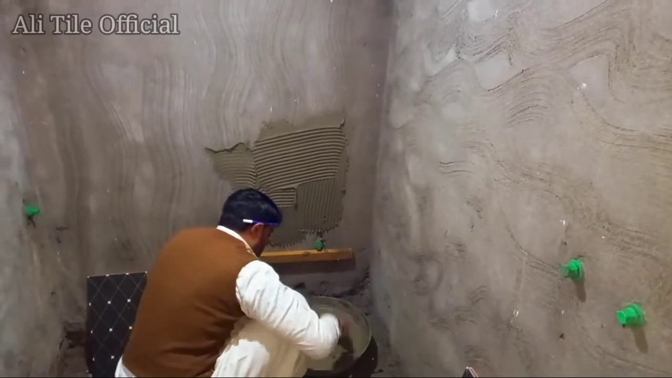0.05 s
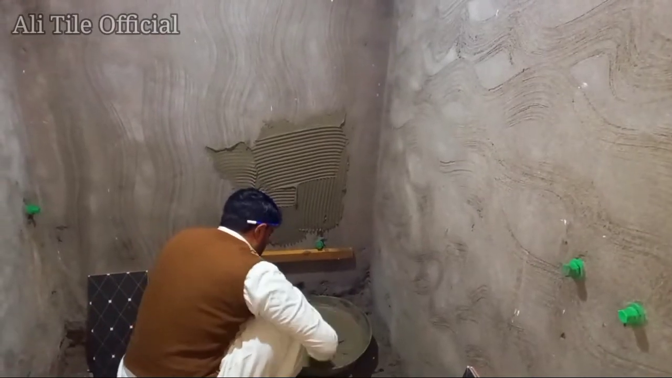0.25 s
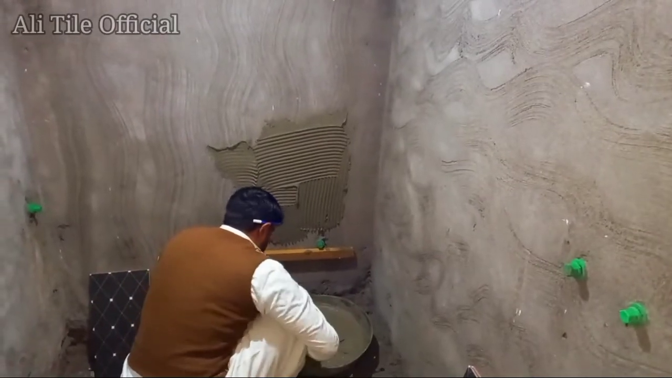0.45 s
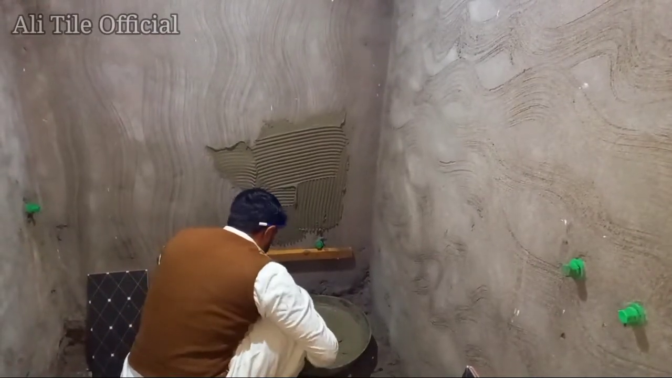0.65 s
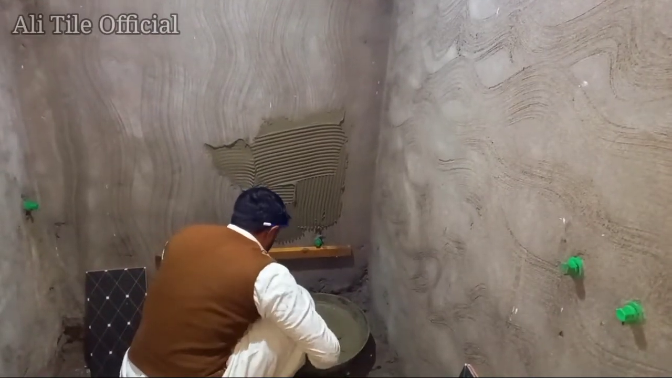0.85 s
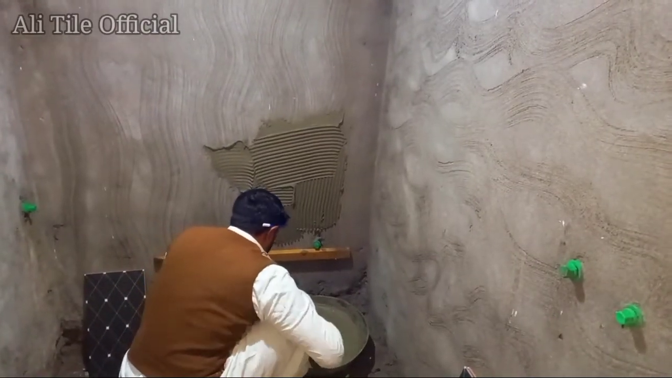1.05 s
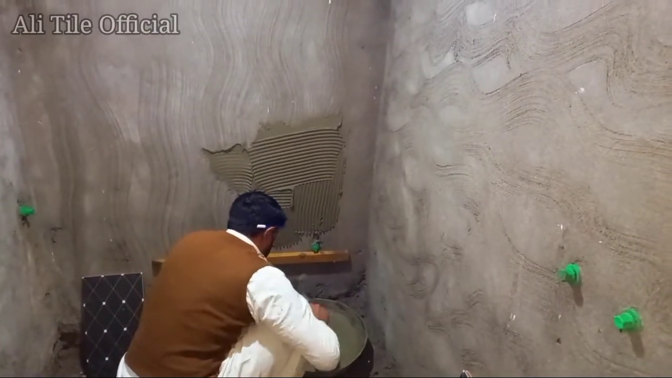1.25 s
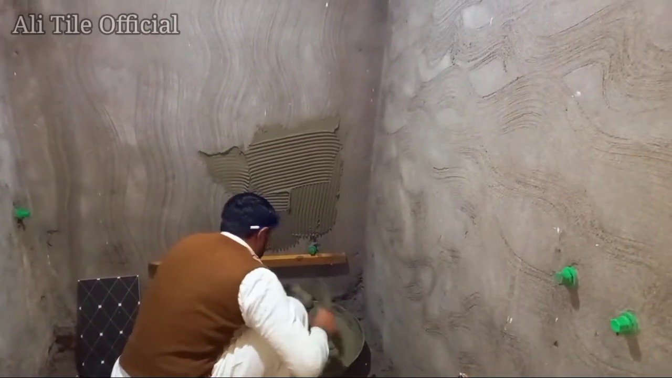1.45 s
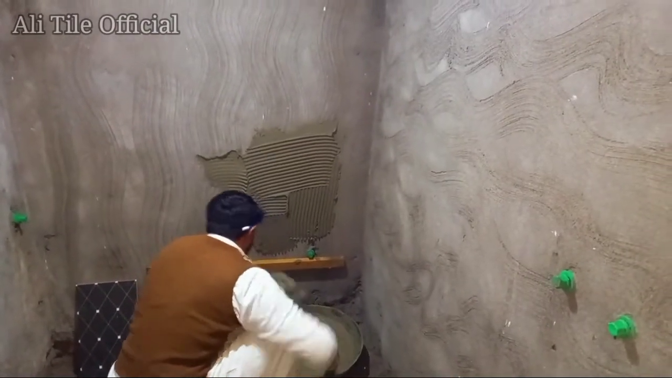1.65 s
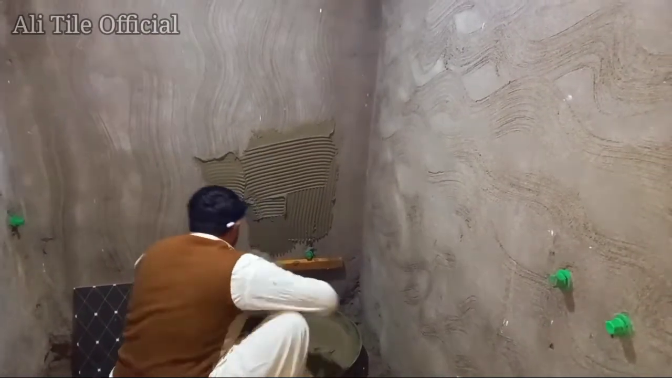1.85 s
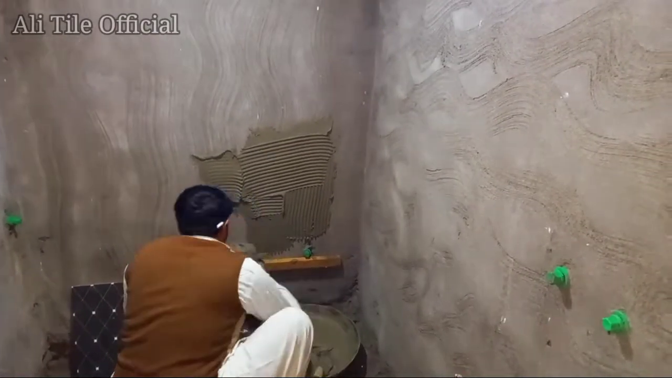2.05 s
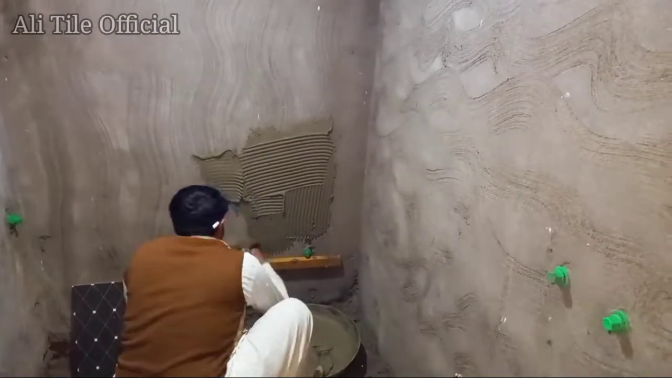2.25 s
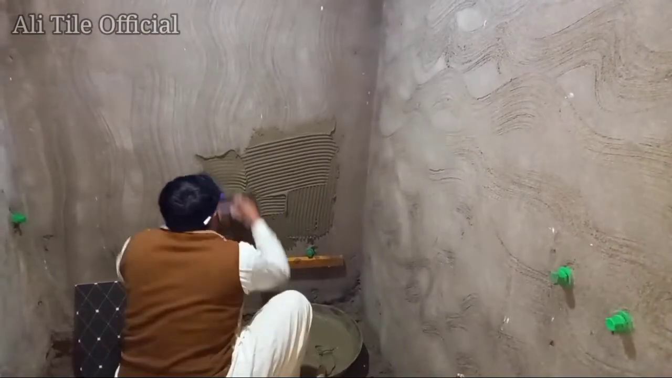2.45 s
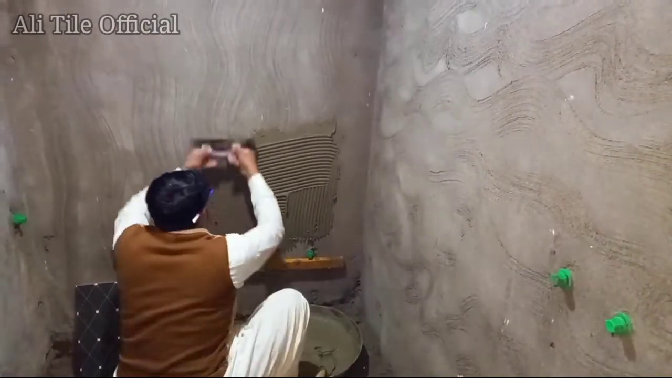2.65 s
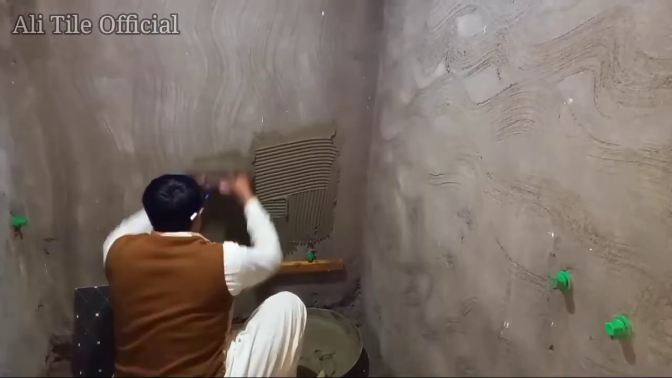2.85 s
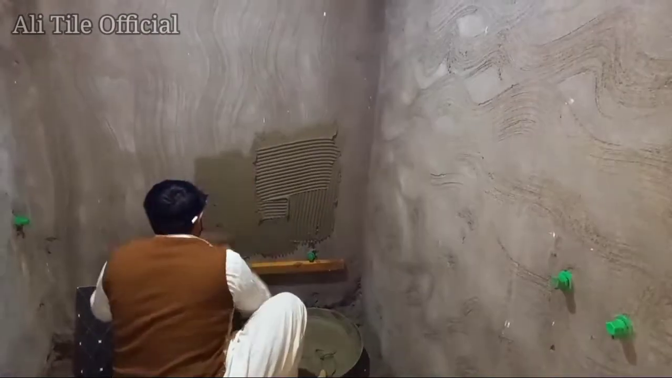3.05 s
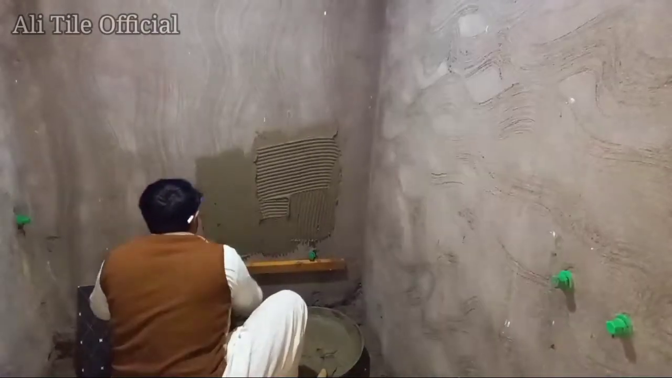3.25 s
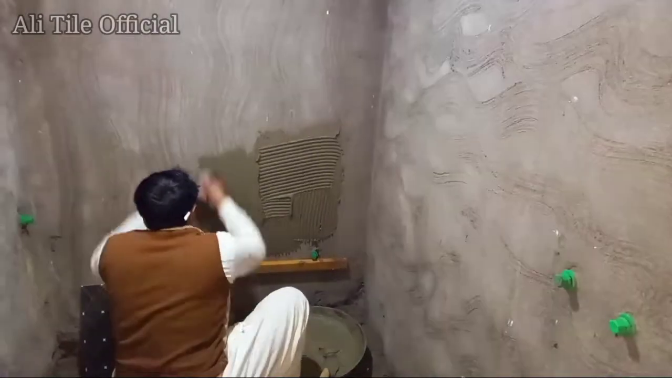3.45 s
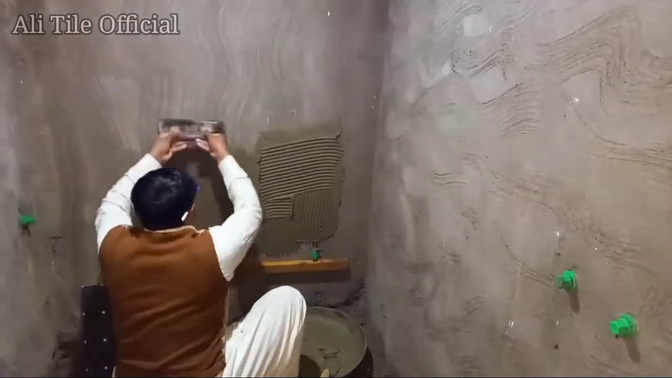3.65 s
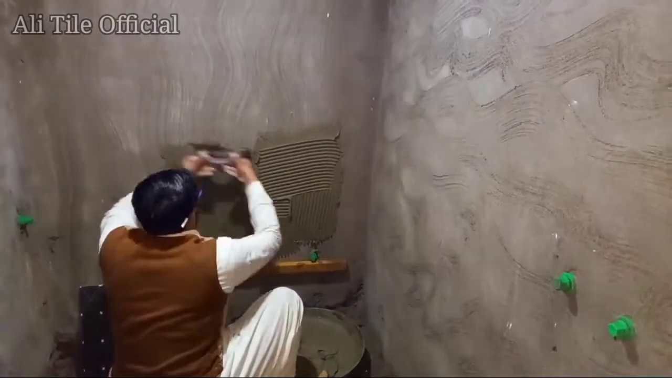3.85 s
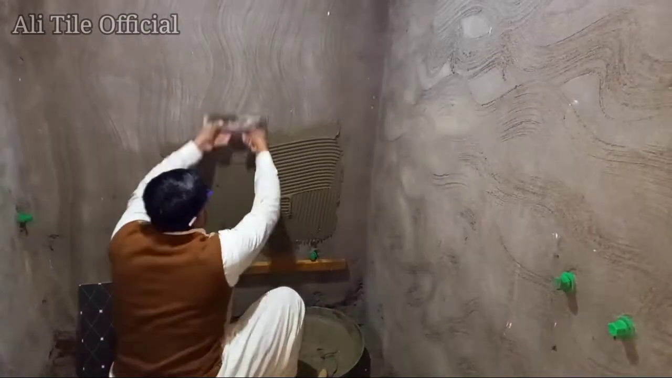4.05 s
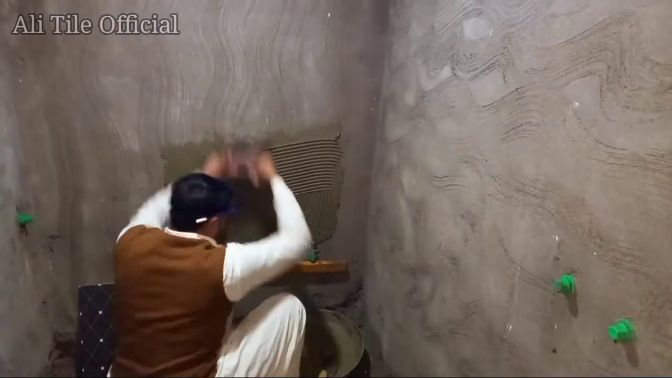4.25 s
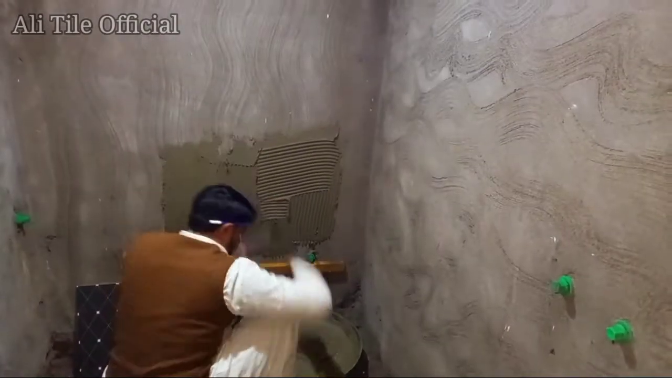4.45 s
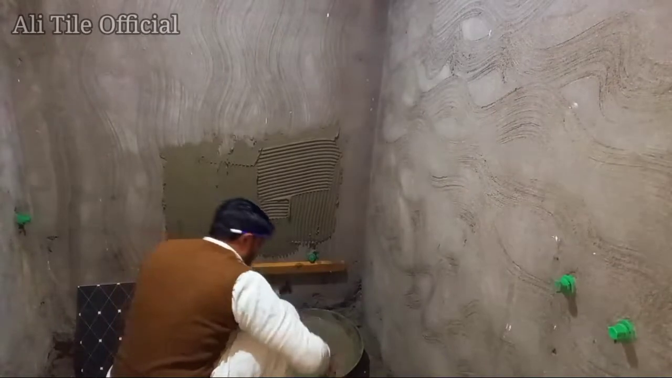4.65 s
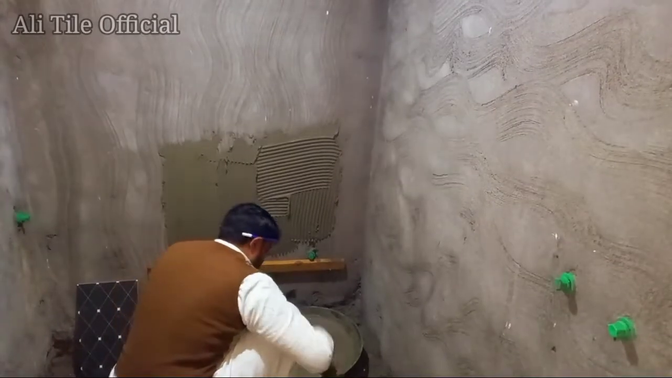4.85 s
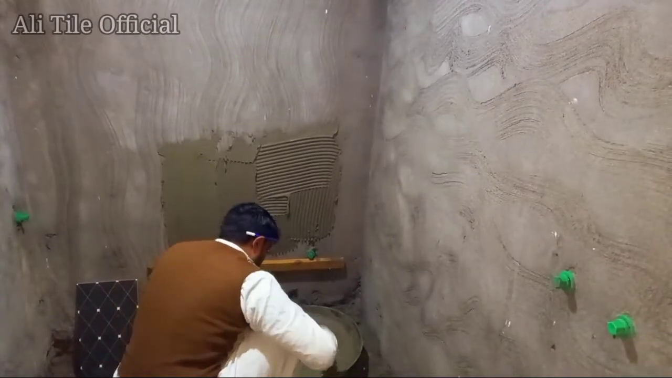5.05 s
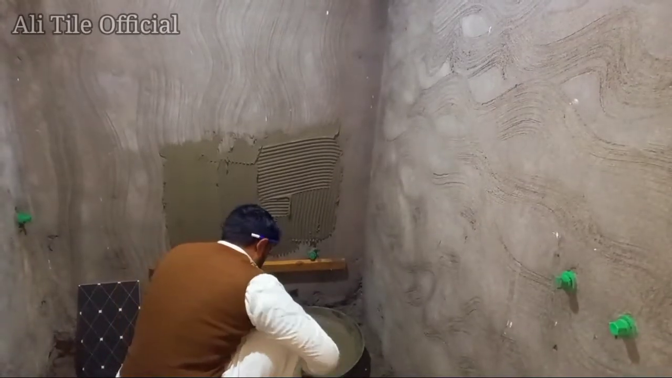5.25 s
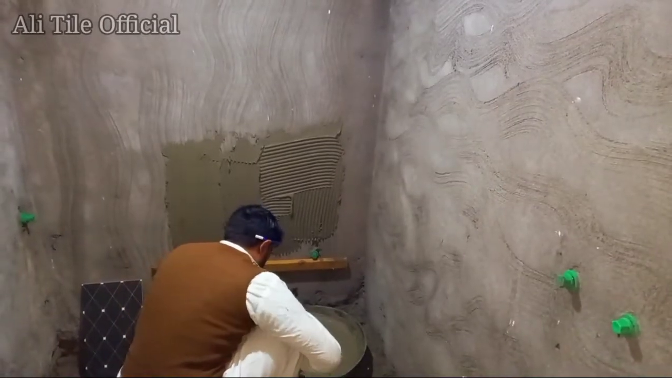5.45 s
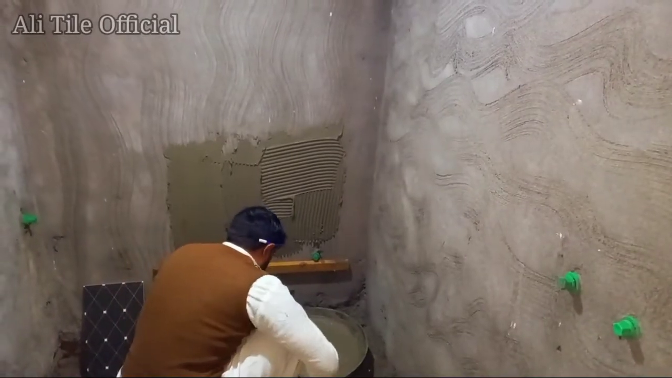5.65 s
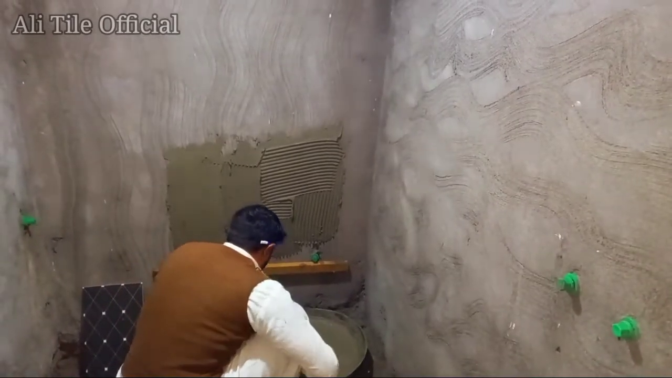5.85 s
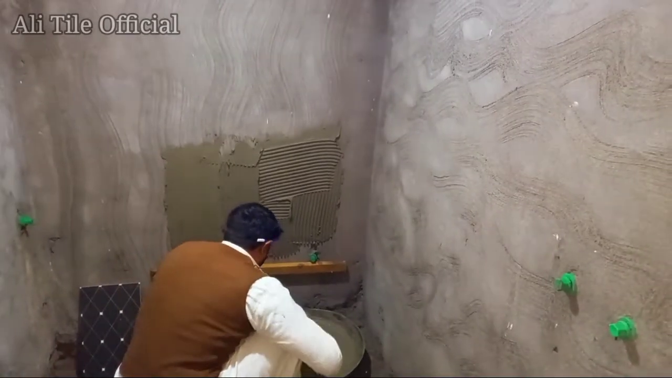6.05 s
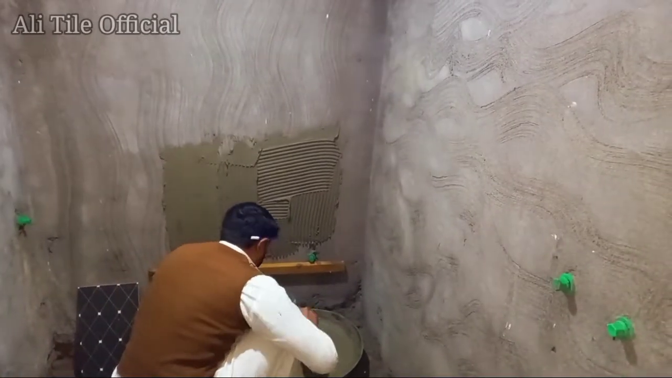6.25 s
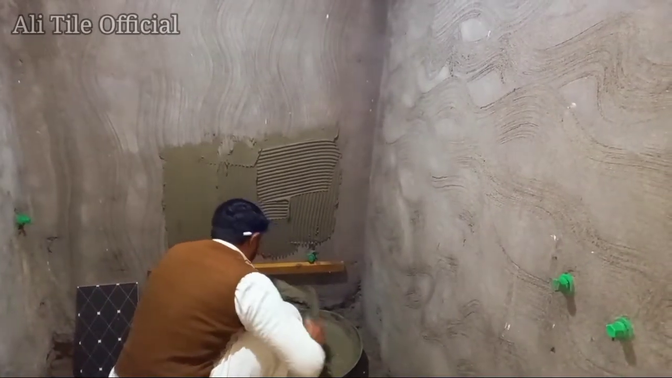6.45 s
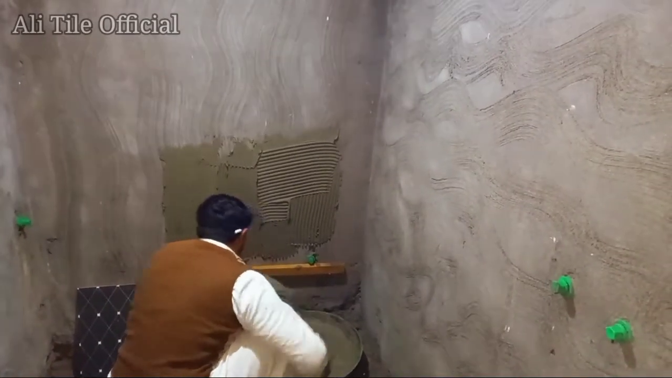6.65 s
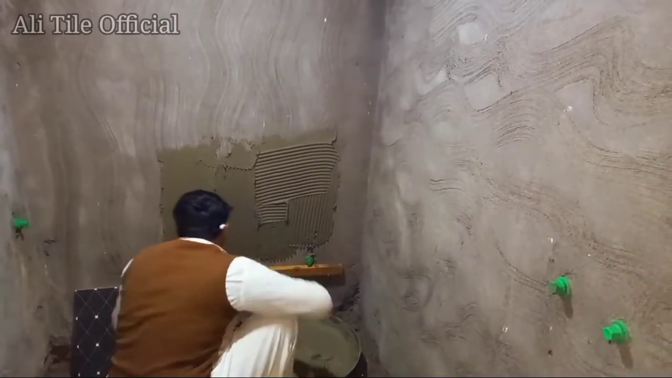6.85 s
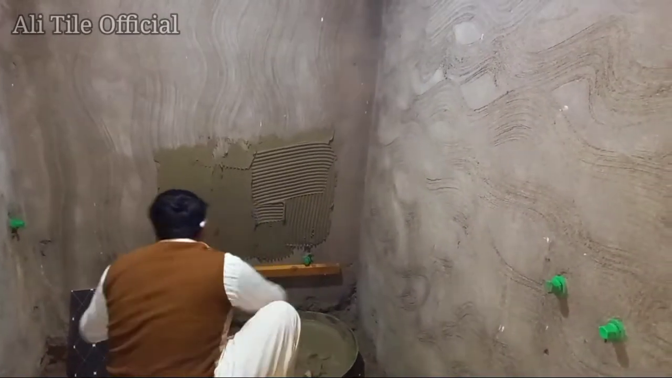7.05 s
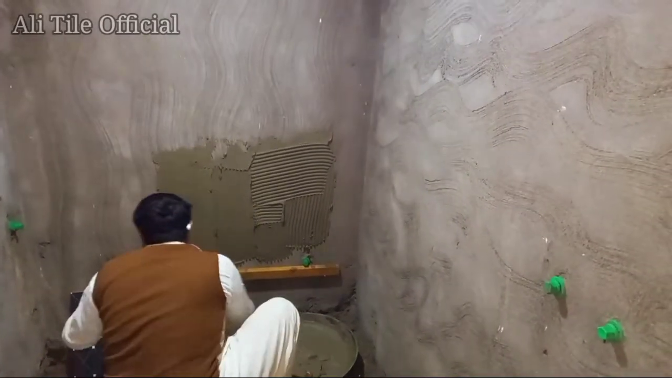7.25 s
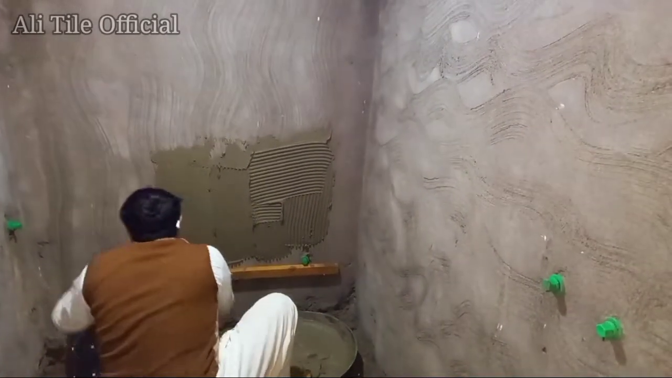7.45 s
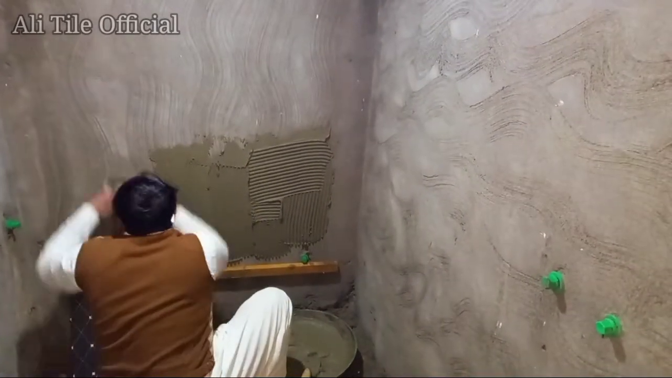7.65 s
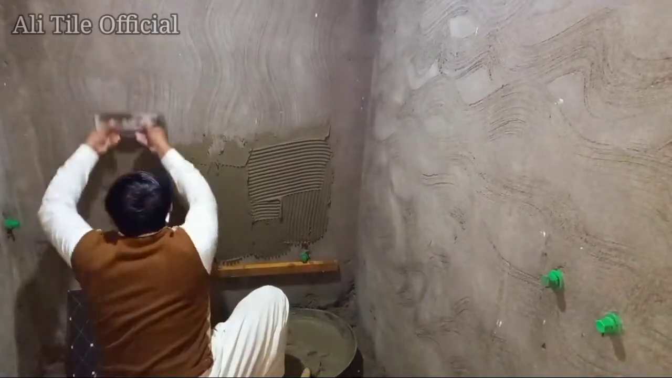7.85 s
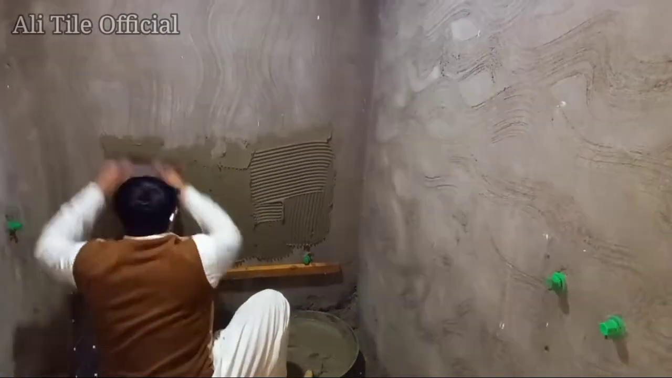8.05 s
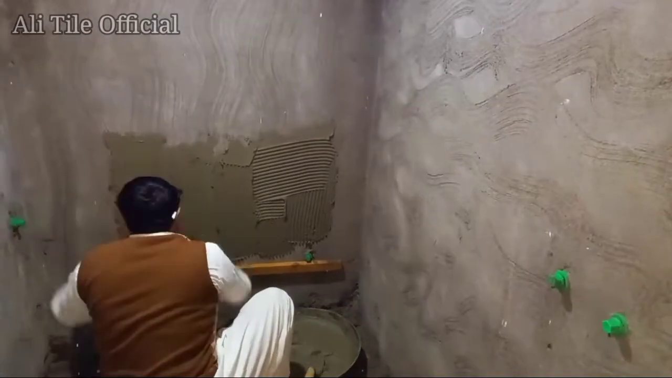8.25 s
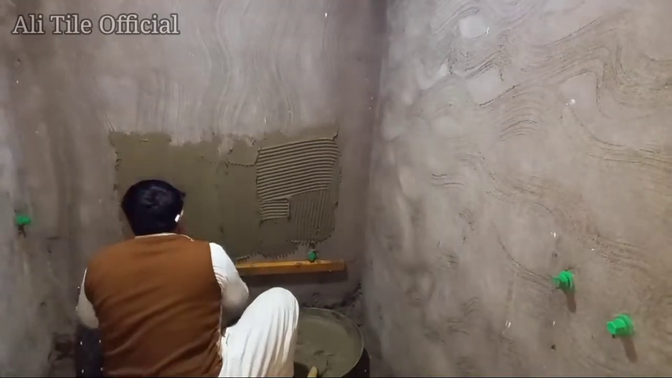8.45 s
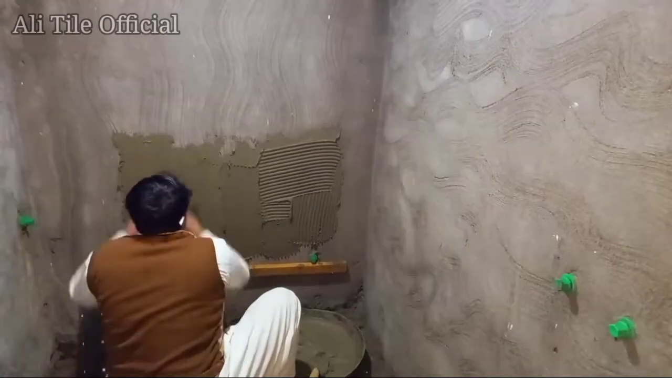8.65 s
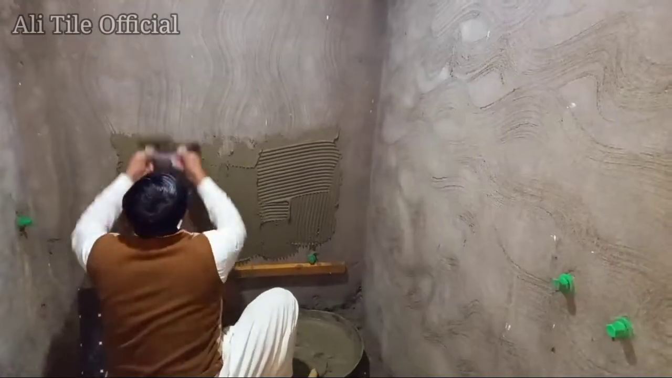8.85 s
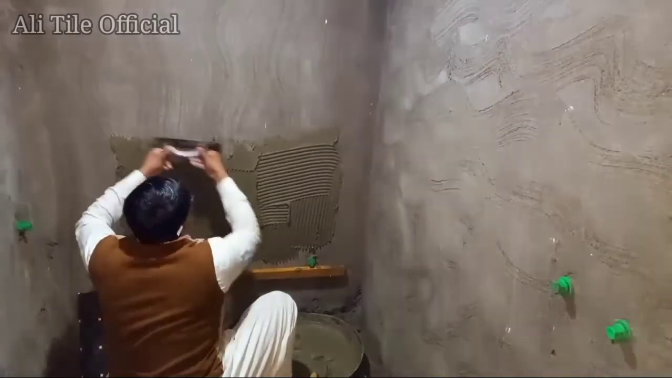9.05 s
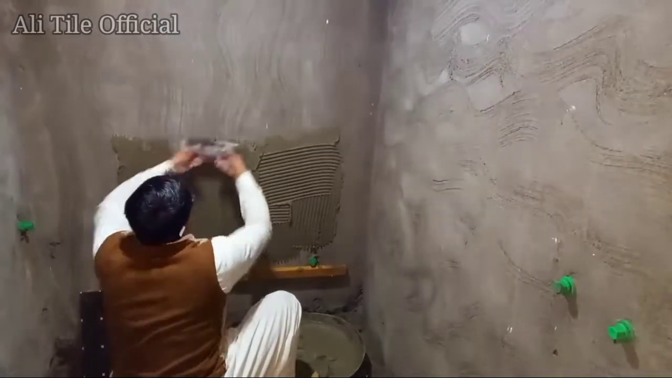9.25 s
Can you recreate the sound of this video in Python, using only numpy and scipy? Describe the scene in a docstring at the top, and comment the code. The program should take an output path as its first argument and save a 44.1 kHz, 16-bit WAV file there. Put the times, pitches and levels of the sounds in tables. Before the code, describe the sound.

Soft gritty stirring and small scrapes come first, then a solid thud with a metallic click, and hissing, ringing trowel strokes over a rough wall. The work drops back to faint tub scraping, with a few sharper scuffs, before a second knock and more strokes, ending on a hard slap of the blade. Clothes rustle lightly. The bare room rings on briefly after each sound; the stereo pickup is slightly distant, with faint hiss.

```python
"""Trowel and adhesive in a bare room

In a small bare room a steel trowel scoops sandy adhesive from a tub and drags it over a plastered wall.
Random sand grains catch under the edge; filtered, they hiss, ring the blade and shake the surface below.
Lumps of paste land with thuds, the edge ticks, the blade hums briefly and clothes rustle.
Hard walls ring on after each stroke, with standing waves in the bass; a low murk and hiss lie behind.
All is heard through a two-port microphone that loses the deep bass and the top of the treble."""
import sys
import numpy as np
from scipy import signal
from scipy.fft import rfft, irfft, next_fast_len
from scipy.io import wavfile
from scipy.ndimage import uniform_filter1d

SR = 44100
rng = np.random.default_rng(int(sys.argv[2]) if len(sys.argv) > 2 else 0)


def output_pcm(signal):
    """Save a mono or channel-first signal as 16-bit PCM at the path in sys.argv[1].

    Samples are clipped to [-1, 1] before scaling.
    """
    pcm = np.clip(np.atleast_2d(signal).T, -1, 1) * 32767
    wavfile.write(sys.argv[1], SR, np.round(pcm).astype(np.int16))


N = 410571  # length in samples


def amp(db):
    """Turns dB into a linear gain."""
    return 10 ** (np.asarray(db) / 20)


def evened(x):
    """Scales a sound to rms 1."""
    return x / np.sqrt(np.mean(x ** 2) + 1e-20)


def read(points, hz):
    """Reads a (Hz, value) curve, with straight lines over log frequency."""
    f, value = np.transpose(points)
    return np.interp(np.log(hz + 1), np.log(f + 1), value)


def add(mix, s, sound):
    """Lays a sound into the mix at s seconds, cut off at the end of the mix."""
    part = mix[round(s * SR):][:len(sound)]
    part += sound[:len(part)]


def coloured(x, points):
    """Filters by a dB spectrum, to rms 1."""
    size = next_fast_len(len(x))
    gain = amp(read(points, np.fft.rfftfreq(size, 1 / SR)))
    return evened(irfft(rfft(x, size) * gain, size)[:len(x)])


def resonate(x, hz, width):
    """One steady resonance of gain 1 at its peak."""
    return signal.lfilter(*signal.iirpeak(hz, hz / max(width, 3), SR), x)


def sliding(x, hz, width):
    """A moving resonance: shifts the curve hz down to zero, smooths, and shifts back."""
    turn = np.exp(2j * np.pi * np.cumsum(hz) / SR)
    smooth = signal.lfilter(*signal.butter(N=2, Wn=width / 2, fs=SR), x / turn)
    return evened((turn * smooth).real)


def wavering(size):
    """Slow random wander of rms 1: noise averaged twice over size samples."""
    return evened(uniform_filter1d(uniform_filter1d(rng.standard_normal(N), size=size), size=size))


SWELL = 2.02  # exponent: the level in dB moves fast at first, then levels off


def played(starts, lengths, first_db, last_db, fades):
    """Gain over time: each event starts at once, moves to its last level and lets go; the loudest counts."""
    db, t = np.full(N, -200.), np.arange(N) / SR
    for start, length, first, last, fade in np.broadcast(starts, lengths, first_db, last_db, fades):
        left = np.clip(1 - (t - start) / max(length, 1e-3), 0, 1)
        let_go_db = 60 * np.maximum(t - start - length, 0) / max(fade, 1e-2)  # fade is the time to fall 60 dB
        now = last + (first - last) * left ** SWELL - let_go_db
        db = np.maximum(db, np.where(t >= start, now, -200))
    return uniform_filter1d(amp(db), size=90)


# Likeness of left and right. Each row: frequency in Hz, correlation from -1 to 1.
LIKENESS = [(60, 0.8), (130, 0.83), (300, 1), (600, .55), (1000, -0.23), (1500, -0.11), (2500, -0.044),
            (8000, -0.047)]


def paired(a, b):
    """Two channels whose likeness varies with frequency, high in the bass and near none in the treble."""
    same = np.clip(read(LIKENESS, np.fft.rfftfreq(len(a), 1 / SR)), -1, 1)
    right = irfft(same * rfft(a) + np.sqrt(1 - same ** 2) * rfft(b), len(a))
    return np.array([a, right])


# Spectrum of the quiet background. Each row: frequency in Hz, relative level in dB per Hz.
HUSH_SPECTRUM = [(25, -21), (45, -12.5), (65, 6), (95, -3.5), (150, -7.5), (200, -6), (320, -7.5),
                 (500, -22.5), (800, -16), (1250, -21), (1800, -16), (2600, -27), (7500, -23.5),
                 (10000, -32), (16000, -38.5)]
HUSH_DB = -70  # middle level at the microphone, before its own filters


def hush():
    """Low distant murk of the building and microphone hiss: shaped noise, wavering slowly by about 2 dB."""
    sway = wavering(size=6000)
    left, other = (coloured(rng.standard_normal(N), HUSH_SPECTRUM) for _ in "LR")
    return amp(HUSH_DB + 2 * sway) * paired(left, other)


def sand(per_s, spread_db):
    """Grains catch the edge at random, a few much harder; the drag judders."""
    size = amp(spread_db * np.minimum(rng.exponential(1, N), 5)) * rng.choice([-1., 1.], N)
    judder_db = 2.4 * wavering(size=700)
    caught = rng.random(N) < per_s / SR
    return size * caught * amp(judder_db)


# Hiss of the grit, close to the blade. Each row: frequency in Hz, relative level in dB per Hz.
GRIT_SPECTRUM = [(410, -37.5), (700, -27), (922, -3.5), (1260, -7), (1460, -6), (2160, -6), (2660, -3.5),
                 (9480, -6.5), (14200, -6.5), (16000, -13.5)]
# Clothes rustle as the worker turns.
# Each row: start in seconds, length in seconds, first and last level in dB before the room.
RUSTLES_HEARD = [(1.87, 0.14, -68, -62), (4.4, 0.045, -64, -73), (6.92, 0.25, -56.5, -63),
                 (8.1, 0.14, -65, -74), (9.05, 0.23, -57, -56.5)]
RUSTLE_FADE_S = 0.25  # time to fall 60 dB


def rustles():
    """Soft broad swish of cloth: dense, nearly equal random clicks in the colour of the grit."""
    cloth = coloured(sand(per_s=7500, spread_db=0.5), GRIT_SPECTRUM)
    return played(*np.transpose(RUSTLES_HEARD), RUSTLE_FADE_S) * cloth


# The blade hums briefly on one mode. Each row: start in seconds, length in seconds, centre in Hz,
# width in Hz (never under 50 in use), level in dB before the room and the rise and fall.
BLADE_HUMS = [(0.002, .11, 765, 50, -74), (2.09, .1, 1150, 450, -62), (3.09, .08, 800, 300, -66),
              (4.15, .07, 1050, 110, -41), (4.74, .05, 2400, 150, -72), (4.92, .5, 1720, 260, -77),
              (5.1, .32, 985, 60, -70), (6.24, .07, 3200, 150, -51), (6.52, .28, 7600, 400, -64),
              (6.69, .12, 3130, 90, -60), (6.95, .2, 1850, 350, -63), (8.95, .2, 930, 90, -49)]


def hums():
    """Brief blade hums: noise through two equal resonances in a row, under a rounded rise and fall."""
    out = np.zeros(N)
    for s, length, hz, width, db in BLADE_HUMS:
        shape = np.sin(np.pi * np.arange(0, length, 1 / SR) / length) ** .5
        wide = max(width, 50)
        tone = evened(resonate(resonate(rng.standard_normal(SR), hz, wide), hz, wide))
        add(out, s, amp(db) * shape * tone[-len(shape):])
    return out


# The blade edge touches down.
# Each row: time in seconds, level in dB of total energy before the room, centre in Hz.
EDGE_TICKS = [(1.674, -21, 1010), (1.755, 3.5, 2000), (3.183, -15, 2010), (3.96, -5, 1690),
              (6.221, -10.5, 3160), (6.513, -17, 2170), (6.704, -26, 2990), (6.817, 3.5, 1930),
              (7.403, -13.5, 2000), (7.841, -5, 1650), (9.244, -16.5, 1980)]


def ticks():
    """Sharp edge contacts: a click and a burst of grit through two wide resonances."""
    out, t = np.zeros(N), np.arange(8192) / SR
    for s, db, hz in EDGE_TICKS:
        grit = 0.085 * rng.standard_normal(len(t)) * amp(-60 * t / .03)
        snap = np.exp(-t * 30000) + grit
        tick = resonate(resonate(snap, hz, 1.6 * hz), hz, 1.6 * hz) + amp(-25.5) * snap
        add(out, s, amp(db) * tick / np.linalg.norm(tick))
    return out


# Paste or blade lands. Each row: time in seconds, level in dB of total energy before the room,
# lower and upper band edge in Hz, decay constant of the squash in seconds.
LANDINGS = [(1.263, -13.5, 234, 497, 0.0043), (1.756, 21, 140, 706, 0.012), (3.188, -9.5, 202, 603, 0.0064),
            (3.96, -7.5, 93.6, 1223, 0.0075), (6.819, 19, 198, 810, 0.0043), (7.401, 5, 206, 328, 0.0096),
            (9.245, 8.5, 196, 910, 0.017)]


def thuds():
    """Dull squashes: a first touch, then noise as the paste spreads, weakened outside a band."""
    out, t = np.zeros(N), np.arange(8192) / SR
    for s, db, low_hz, high_hz, squash in LANDINGS:
        contact = np.exp(-t * 3000)
        push = 1.1 * contact + 0.24 * np.exp(-t / squash) * rng.standard_normal(len(t))
        push = signal.sosfilt(signal.butter(N=4, Wn=high_hz, fs=SR, output="sos"), push)
        weight = amp(-12.0) * push  # the floor takes some of the blow
        push = weight + signal.sosfilt(signal.butter(N=2, Wn=low_hz, btype="high", fs=SR, output="sos"), push)
        add(out, s, amp(db) * push / np.linalg.norm(push))
    return out


# Broad ring of the blade. Each row: frequency in Hz, relative level in dB per Hz.
BLADE_SPECTRUM = [(290, -54.5), (500, -21.5), (552, -20.5), (795, -9), (1480, -6.5), (1680, -4),
                  (1970, -4.5), (3200, -5), (7000, -17.5), (9100, -40), (15400, -120)]
# Narrower modes of the steel. Each row: frequency in Hz, width in Hz, relative level in dB.
STEEL_MODES = [(1720, 29, 0), (3000, 29, -33), (3740, 110, -19), (5370, 28, -31), (5700, 130, -7.5),
               (5665, 110, -4), (6800, 510, -8.5), (7530, 380, 6), (7980, 73, -0.5)]
# Rumble of the tub or wall. Each row: frequency in Hz, relative level in dB per Hz.
RUMBLE_SPECTRUM = [(40, -13), (110, -6), (220, 0), (400, 6.5), (800, 0), (1300, -14), (2500, -47.5)]
# Pushes of the blade. Each row: start in seconds, length in seconds, grit in dB before the room at the
# start and at the end of the push, time in seconds for the grit to fall 60 dB after letting go, blade ring
# in dB over grit, rumble of tub or wall in dB over grit, blade ring in Hz, hollow under the blade in Hz
# at the start and at the end.
PUSHES = [ (0.18, 0.095, -54.5, -56.5, 0.13, -32, -2.5, 2250, 469, 518),
          (0.33, .19, -65, -68.5, .1, -17, -15, 1922, 398, 329),
          (0.559, 0.14, -58, -40, 0.14, 1, 6, 2038, 378, 550),
          (1.242, .015, -46, -41, .1, -11, -7, 2000, 365, 358),
          (1.261, .01, -39, -36, 0.018, -13, -4, 1986, 360, 357),
          (1.32, .012, -51, -43.5, 0.036, -11, 2.5, 1902, 352.3, 355),
          (1.67, 0.0045, -40, -48, 0.026, -6, -4.5, 1909, 349, 351.8),
          (2.232, .065, -40.5, -40.5, .3, -17.5, -1, 1836, 269.3, 264.4),
          (2.35, .34, -39.5, -31.5, .16, -8.5, -4, 2055, 300, 420),
          (2.7, 0.032, -27, -38, 0.085, 0, -0.5, 2060, 520, 500),
          (3.173, 0.033, -31, -43.5, 0.4, -10, -2, 1850, 598, 470),
          (3.31, 0.19, -56.5, -38, 0.32, -3.5, -17, 1882, 485, 937),
          (3.548, 0.11, -35, -27.5, 0.14, 5.5, -10, 2130, 861, 817),
          (3.956, .025, -42, -38.5, 0.23, -3.5, 4, 1950, 686, 710),
          (4.0, 0.1, -26.5, -23, 0.21, 2.5, -15.5, 1927, 723, 902),
          (4.724, .02, -72.5, -78, .3, 9.5, 8.5, 1864, 600, 618.5),
          (4.83, 0.095, -74.5, -66.5, .2, -18, -22, 1907, 618.5, 622),
          (5.19, .17, -62, -68, 0.21, -10.5, -21, 1930, 668, 266.2),
          (5.41, .17, -62.5, -44, .2, 2.5, 5, 1900, 300, 560.6),
          (5.59, .04, -41.5, -41, 0.19, 8.5, 4.5, 2450, 600, 639.5),
          (5.655, .04, -32, -33.5, .12, -1, -2, 2000, 640, 599),
          (6.217, 0.021, -35, -41.5, 0.18, -11.5, -13, 2712, 483, 498),
          (6.51, 0.0094, -24.5, -44.5, 0.16, -0.5, -13, 2144, 592.5, 611),
          (6.689, 0.094, -53, -63.5, .05, -15, 5, 1837, 497, 355.6),
          (7.397, .04, -39.5, -47.5, 0.62, -5.5, 0, 1866, 296.3, 279.6),
          (7.52, 0.11, -56, -42, 0.66, -8, -17, 2100, 269.7, 279.4),
          (7.75, 0.061, -49.5, -47.5, 0.23, -1, -30, 2150, 606, 799),
          (7.835, 0.059, -36, -25.5, 0.14, 5.5, -11, 2065, 815, 815),
          (8.454, 0.08, -38.5, -36.5, 0.26, -8.5, -14.5, 2386, 905, 859),
          (8.58, 0.38, -39, -32, .2, -4.5, -1.5, 1908, 498.4, 720),
          (9.243, .01, -13, -37.5, 0.041, 4.5, 10.5, 1605, 610.5, 615.3), ]
RING_LINGERS, RUMBLE_LINGERS = 1.63, 1.79  # times the let-go of the grit


def strokes():
    """The same grains hiss, ring the steel and shake the surface underneath."""
    grains, t = sand(per_s=9000, spread_db=4.5), np.arange(N) / SR
    (start, length, first_db, last_db, let_go,
     ring_db, rumble_db, ring_hz, *hollow_hz) = np.transpose(PUSHES)
    # both pitches glide on from one push to the next
    ring_hz = np.interp(t, start + length / 2, ring_hz)
    hollow_hz = np.interp(t, np.sort(np.r_[start, start + length]), np.ravel(hollow_hz, "F"))

    modes = evened(sum(amp(db) * evened(resonate(grains, hz, width)) for hz, width, db in STEEL_MODES))
    broad, low = coloured(grains, BLADE_SPECTRUM), coloured(grains, RUMBLE_SPECTRUM)
    ring = evened(broad + amp(-9.5) * modes + amp(-5) * sliding(grains, ring_hz, width=1150))
    rumble = evened(low + amp(-10.5) * sliding(grains, hollow_hz, width=320))
    hiss = coloured(grains, GRIT_SPECTRUM)

    hiss_gain = played(start, length, first_db, last_db, let_go)
    ring_gain = played(start, length, first_db + ring_db, last_db + ring_db, let_go * RING_LINGERS)
    rumble_gain = played(start, length, first_db + rumble_db, last_db + rumble_db, let_go * RUMBLE_LINGERS)
    return hiss_gain * hiss + ring_gain * ring + rumble_gain * rumble


# Decay between the hard walls. Each row: frequency in Hz, time to fall 60 dB in seconds.
WALL_DECAY = [(100, 0.94), (400, 0.52), (1000, 0.46), (2700, 0.31), (5400, 0.28), (8000, 0.24),
              (14000, 0.15)]


def echoes():
    """Dense random echoes that build up fast and die at a different rate in each band."""
    taps, t = np.zeros((2, SR)), np.arange(SR) / SR
    slots = np.arange(60, SR - 20, 12)  # one echo in every 12 samples
    at = slots + rng.integers(0, 12, (2, len(slots)))
    np.put_along_axis(taps, at, rng.choice([-1., 1.], at.shape), 1)
    hz, frame, z = signal.stft(paired(*taps), SR, nperseg=512)
    thin_bass_db = np.interp(hz, [100, 500, 1100], [-16, -8, 0])[:, None]  # leaves room for standing waves
    decay_db = -60 * frame / read(WALL_DECAY, hz)[:, None]
    tail = signal.istft(z * amp(thin_bass_db + decay_db), SR, nperseg=512)[1][:, :SR]
    tail *= np.minimum(t / 0.011, 1) * (t > .0015)
    return tail / np.linalg.norm(tail[0])


# Standing waves of the room. Each row: frequency in Hz, relative level in dB,
# time to fall 60 dB in seconds (never over 0.6 in use).
STANDING_WAVES = [(64, 0.5, 1), (95, -6, 0.54), (118.5, -3.5, 0.74), (180.8, -2.5, 0.49),
                  (236.6, -4.5, 0.84), (268.6, -1.5, 0.56), (323, -6, 1), (373.7, -2.5, 0.38),
                  (416.5, -8, .5), (482, -5.5, 0.66), (540.6, -0.5, 0.2), (593, 1, 0.31), (624, -10, 0.68),
                  (707, 3, 0.24), (793, -13.5, 1), (888, -9, .4), (1027, -8.5, .25)]


def standing_waves():
    """Decaying sines at the room's modes, with a phase step between the two channels."""
    t, waves = np.arange(SR) / SR, 0
    for k, (hz, db, t60) in enumerate(STANDING_WAVES):
        phase = np.array([[0], [(0.22 + hz / 1500) * (-1) ** k]])  # left, right in radians
        decay = amp(db - 60 * t / min(t60, .6))
        waves = waves + decay * np.sin(2 * np.pi * (hz * t + rng.random()) + phase)
    waves *= np.minimum(t / 0.0065, 1)
    return waves / np.linalg.norm(waves[0])


def room(x, count=4, moves_per_s=16.0):
    """Direct sound, standing waves, and echoes whose pattern shifts steadily, 16 times a second."""
    out = amp(-11.5) * x + amp(-18.0) * signal.fftconvolve(x[None], standing_waves(), axes=1)[:, :N]
    # crossfades from one echo pattern to the next, round and round, so the random tail is less tonal
    place = np.arange(N) / SR * moves_per_s
    for k in range(count):
        away = abs((place - k + count / 2) % count - count / 2)
        near = np.cos(np.pi / 2 * np.minimum(away, 1))
        out += signal.fftconvolve((x * near)[None], echoes(), axes=1)[:, :N]
    return out


def scene():
    """Everything at the wall and tub sounds in the room; the hush lies under it."""
    return room(strokes() + rustles() + thuds() + ticks() + hums()) + hush()


# Colour of the two microphone ports. Each row: frequency in Hz, left minus right in dB.
PORT_LEAN = [(60, -0.5), (99, -0.5), (160, 0.0), (270, 1.0), (450, 0.5), (740, 0.5), (1220, -0.5),
             (2010, -1), (3330, 1.5), (5500, 5), (9080, -6), (15000, -7)]
BASS_CUT_HZ, EDGE_HZ = 55, 15750  # lower and upper limit


def record(dry):
    """The capsules lose the deep bass and the two ports differ in colour; then the band limit."""
    hz = np.linspace(0, SR / 2, 257)
    ports = [signal.firwin2(255, hz, amp(side * read(PORT_LEAN, hz) / 2), fs=SR) for side in (1, -1)]
    lean_bass = signal.lfilter(*signal.butter(2, BASS_CUT_HZ, "high", fs=SR), dry)
    heard = signal.oaconvolve(lean_bass, ports, "same", axes=1)
    band_limit = signal.firwin(511, EDGE_HZ, window=("kaiser", 9), fs=SR)
    return signal.oaconvolve(heard, band_limit[None], "same")


dry = scene()
out = record(dry)
output_pcm(out)
```